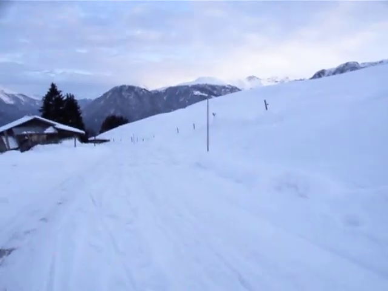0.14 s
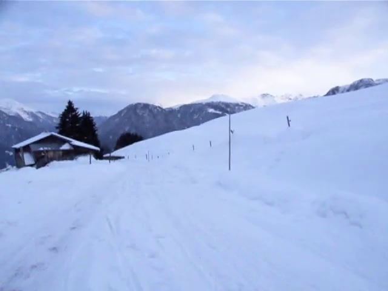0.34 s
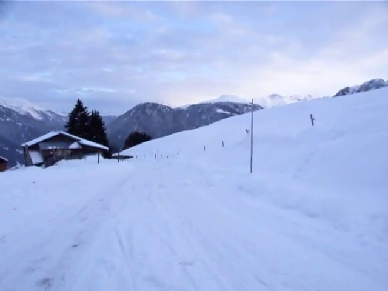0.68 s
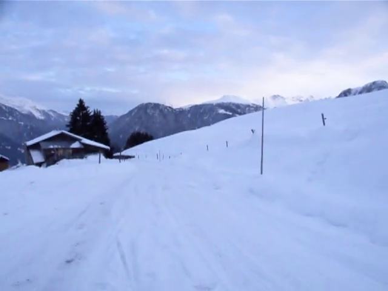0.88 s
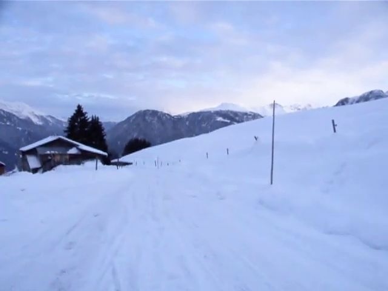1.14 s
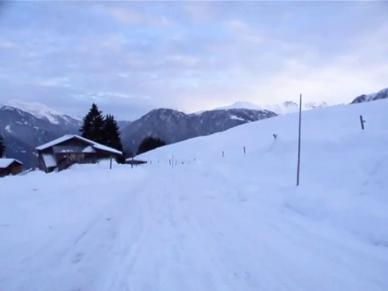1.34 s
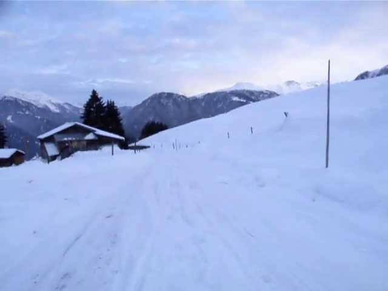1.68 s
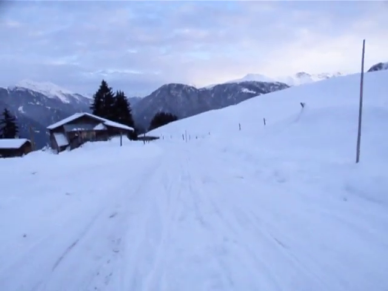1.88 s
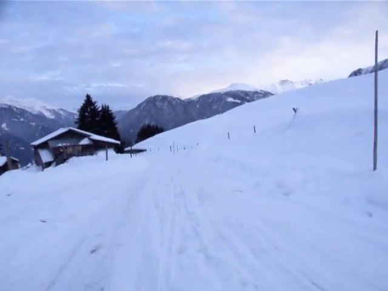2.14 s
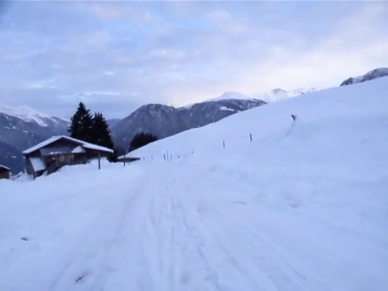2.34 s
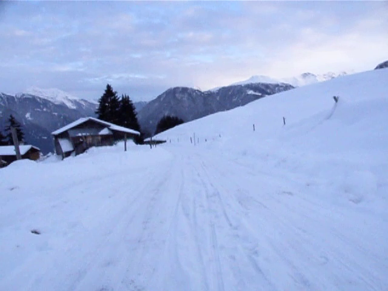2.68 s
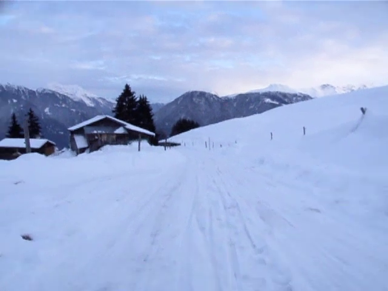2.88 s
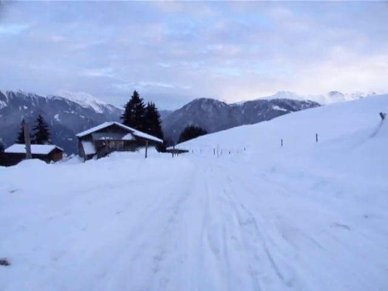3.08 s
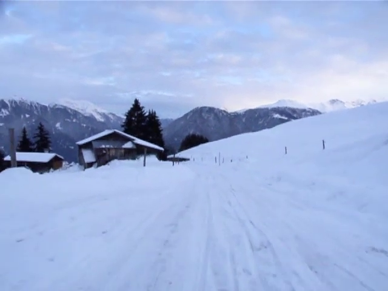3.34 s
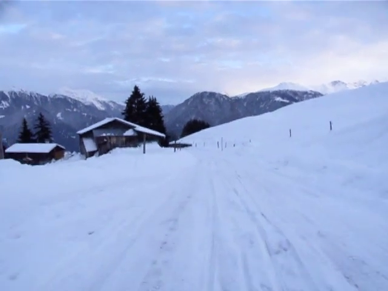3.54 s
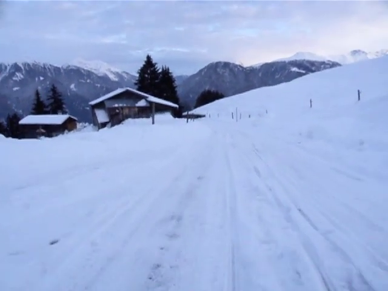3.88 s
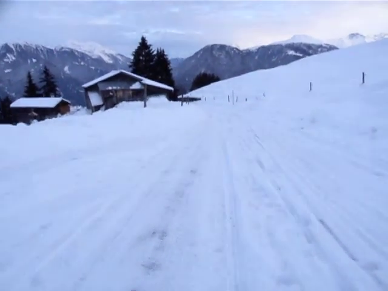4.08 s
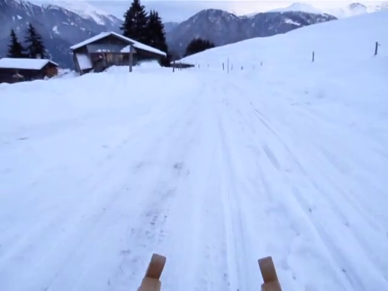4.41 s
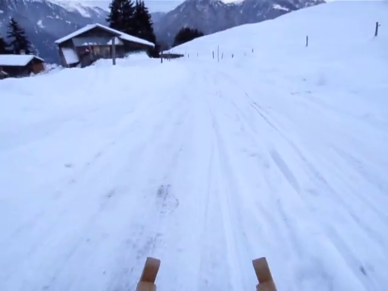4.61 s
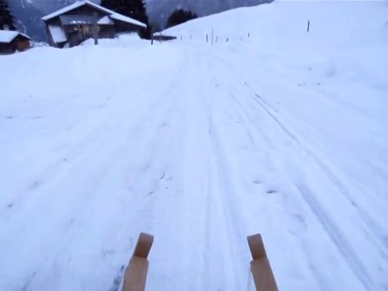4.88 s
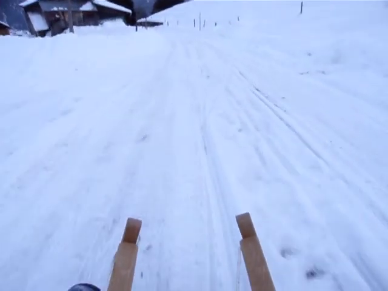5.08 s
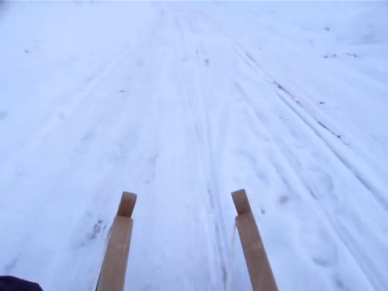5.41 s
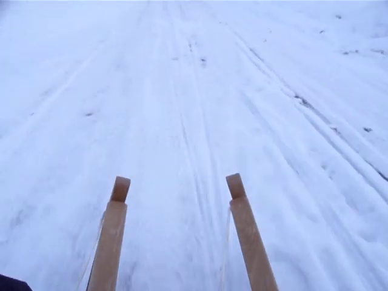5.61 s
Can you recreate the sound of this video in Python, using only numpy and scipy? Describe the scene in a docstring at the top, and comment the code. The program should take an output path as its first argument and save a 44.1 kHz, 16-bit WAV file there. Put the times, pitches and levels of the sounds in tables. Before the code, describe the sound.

Dull, narrow-band onboard sound of sledge runners rasping along a snowy track, knocking on ice lumps, with growing wind thumps on the microphone.

```python
"""Runners scrape and hiss over packed snow: a wooden sledge, heard through a small camera held by the rider.
Breaking snow crystals are random impulses and noise that set the resonances of the frame ringing.
Head wind buffets the microphone port: fluttering bands of low noise, with short waves for thumps.
Lumps of ice knock and rasp: rough bursts of force that ring the same frame, bent to the pitch of each blow.
The camera turns itself down after loud sounds, has a narrow band and flattens the highest peaks."""
import sys
import numpy as np
from scipy import signal
from scipy.io import wavfile

SR = 44100
rng = np.random.default_rng(int(sys.argv[2]) if len(sys.argv) > 2 else 0)


def nominal_scale(level):
    """Amplitude ratio for a level in decibels (scalar or array-like)."""
    x = np.asarray(level, float) / 20
    return 10 ** x


def waveform_to_disk(signal):
    """Save audio, clipped to [-1, 1], as 16-bit WAV at the path in sys.argv[1]."""
    frames = np.transpose(np.atleast_2d(signal))
    scaled = np.clip(frames, -1, 1) * 32767
    samples = np.round(scaled).astype(np.int16)
    wavfile.write(sys.argv[1], SR, samples)


N = 253134  # samples, about 5.74 s

# Runners pressed down and lifted by bumps in the road: start_s, level_db
SCRAPE_LEVELS = [(0, -25.5), (.12, -30.5), (.15, -20), (.24, -28), (.52, -26.5), (.66, -23), (.8, -29),
                 (.95, -31), (1.2, -31), (1.4, -28.5), (1.5, -33), (1.6, -26.5), (1.72, -31), (1.81, -24.5),
                 (1.98, -25), (2.08, -23), (2.18, -29), (2.44, -29.5), (2.5, -26), (2.61, -22),
                 (2.68, -31.5), (2.91, -26.5), (3.08, -29.5), (3.3, -29), (3.46, -29), (3.54, -34),
                 (3.8, -29), (3.97, -30.5), (4.08, -23), (4.22, -27), (4.38, -30), (4.5, -29),
                 (4.555, -29.5), (4.59, -29.5), (4.7, -31), (4.8, -30.5), (4.94, -22), (5.0, -27),
                 (5.07, -32.5), (5.13, -26), (5.21, -30), (5.27, -30), (5.36, -31), (5.4, -26), (5.55, -30),
                 (5.66, -25.5), (5.74, -30)]
# Colour of the scrape, relative to its level: start_s, hiss_db, rumble_db
SCRAPE_COLOUR = [(0, -2.5, 0), (.4, -3, 0), (.65, -1.5, -7), (.9, 3, -0.5), (1.18, -0.5, -4),
                 (1.4, -1.5, -3.5), (1.8, -2.5, -11), (2.1, -2.5, -3.5), (2.35, -0.5, -6), (2.7, -2, -4.5),
                 (3.1, -2.5, 0), (3.5, -2.5, -8.5), (4.2, -2.5, -3.5), (4.7, 1, -5), (5.1, -1.5, -0.5),
                 (5.74, 1, -3.5)]
# Resonances of the wooden frame, in three groups: pitch_hz, width_hz, level_db
LOW_MODES = [(343.7, 221, 0), (447.5, 236, 4), (593, 278, 0)]
MIDDLE_MODES = [(817, 266, -6.5), (1022.7, 118, 5), (1186, 200, 0)]
HIGH_MODES = [(1482, 135, -1.5), (1865, 308, 2.5), (2148, 370, 2), (2782, 380, 2), (3117, 346, 1.5),
              (3955, 320, 0.5)]
# Strength of the head wind: start_s, flutter_db, deep_buffeting_db
GUSTS = [(0, -38.5, -70), (.5, -48.5, -69), (1.25, -57, -68.5), (1.4, -39.5, -58), (1.53, -53, -58),
         (1.61, -38, -45), (1.8, -40.5, -52), (2.09, -35, -43.5), (2.28, -41.5, -49), (2.45, -52.5, -57.5),
         (2.75, -48, -71), (2.95, -40, -60.5), (3.12, -41, -62), (3.3, -42, -45.5), (3.55, -37.5, -41.5),
         (3.68, -31.5, -34.5), (3.82, -28, -39), (4.0, -26.5, -42), (4.2, -22, -48), (4.24, -35, -53.5),
         (4.3, -24, -47.5), (4.4, -32, -40.5), (4.5, -24, -37.5), (4.62, -27.5, -36), (4.68, -26, -29),
         (4.75, -28.5, -41), (4.82, -36, -50), (4.87, -33, -46), (4.92, -37, -35), (5.03, -19.5, -37),
         (5.085, -37, -33.5), (5.13, -19.5, -39), (5.19, -32, -30.5), (5.23, -32, -37), (5.4, -44.5, -48.5),
         (5.58, -33.5, -59), (5.74, -42, -51)]
# Colour of the wind noise, before each part is scaled to its gust level: pitch_hz, level_db (per Hz)
WIND_COLOUR = [(24, -50), (40, -23), (75, -22), (157, -7), (216, -2), (272, -4), (325, -3), (480, -15),
               (700, -27.5), (910, -36), (1540, -120)]
# Strong low thumps on the microphone, from eddies and jolts through the hand: start_s, peak_db, pitch_hz
THUMPS = [(1.435, -18, 377), (1.587, -21, 262), (1.621, -18.5, 242), (1.659, -20, 177), (1.825, -18.5, 330),
          (1.85, -13, 444), (2.048, -16, 475), (2.058, -21.5, 424), (2.589, -14, 420), (2.93, -7.5, 360),
          (3.0642, -5.5, 330), (3.106, -19, 380), (3.787, -9.5, 306), (3.816, -14, 318), (3.855, -15, 334),
          (3.951, -14, 263), (3.967, -13, 287), (3.992, -10.5, 298), (4.022, -13, 342), (4.048, -12, 376),
          (4.061, -8, 347), (4.122, -15, 314), (4.16, -17, 240), (4.2, -13, 285), (4.2264, -11.5, 397),
          (4.306, -4.5, 564), (4.452, -14.5, 237), (4.488, -11.5, 280), (4.503, -12, 334),
          (4.511, -17, 260), (4.549, -7.5, 246), (4.587, -11.5, 285), (4.613, -15, 273), (4.625, -11, 312),
          (4.632, -12.5, 330), (4.678, -11, 322), (4.722, -11.5, 250), (4.742, -16.5, 279),
          (4.857, -11.5, 228), (5.011, -10, 302), (5.023, -12, 250), (5.0558, -7, 340), (5.0675, -10, 340),
          (5.114, -14, 215), (5.155, -9.5, 295), (5.175, -9, 313), (5.332, -12, 335)]
# Lumps of ice under the runners, pitch being that of the mode struck hardest and reach
# how far the blow spreads to the others: start_s, peak_db, pitch_hz, reach_octaves, contact_ms
LUMPS = [(0.138, -8.5, 1540, 0.57, 4.4), (0.144, -12, 945, 1.4, 8), (0.156, -10.5, 937, 0.57, 3.2),
         (0.1902, -.8, 430, 1.1, 1.8), (0.189, -10, 2600, 1, .8), (0.211, -9, 2820, 0.84, 5.8),
         (0.259, -15, 820, 0.54, 4.5), (0.291, -15.5, 602, 0.68, 11), (0.398, -18.5, 2080, 0.18, 13),
         (0.566, -15, 1150, 1.1, 41), (1.277, -14.5, 1170, 3.3, 12.3), (1.38, -13, 1103, 3.2, 2.9),
         (1.418, -15.5, 2260, 1.2, 5), (1.786, -22, 1280, .6, 4.5), (1.789, -10, 1810, 1, 4.9),
         (1.792, -13, 2820, .6, 4.6), (1.826, -13.5, 1110, 0.8, 1.3), (1.849, -7.5, 1104, 2, 7.2),
         (1.938, -17.5, 625, 2, 4.5), (1.974, -12.5, 1130, 0.92, 4.6), (2.044, -10, 1620, 3.1, 29),
         (2.08, -13, 840, 2.4, 8.3), (2.3236, -5, 1042, 0.79, 5.2), (2.478, -18, 1050, 0.6, 12),
         (2.588, -7, 1530, 1, 6), (2.891, -14.5, 2110, 1.8, 2.7), (2.905, -14, 1120, 0.8, 3.6),
         (2.915, -8, 1094, 1.2, 1.7), (2.922, -8, 1102, 0.52, 7.3), (2.9285, -9, 1342, 1.4, 2.2),
         (2.98, -16, 1000, 0.39, 5.5), (3.028, -18.5, 600, 1.5, 2.1), (3.0638, -6.5, 546, 1.7, 3.5),
         (3.069, -5.5, 570, 1.8, 5.2), (3.104, -7.5, 554, 2.7, 2.7), (3.569, -16.5, 1010, 1.16, 3.8),
         (4.211, -11, 990, 0.43, 11), (4.2276, 2.5, 3450, .5, 1.5), (4.2287, 1.5, 2000, .6, 1.3),
         (4.279, -9, 1547, 3.1, 25), (4.323, -18.5, 2700, 0.67, 11), (4.462, -8, 1000, 1.16, 2.8),
         (4.477, -12, 2180, 0.53, 6.4), (4.506, -8.5, 1165, 4.7, 3), (4.588, -10.5, 919, 2.5, 7.2),
         (4.623, -9, 2500, 0.66, 1.8), (4.649, -18, 1500, 0.87, 8.8), (4.674, -13, 2270, 2.6, 8.3),
         (4.818, -14.5, 1430, 1.6, 4.1), (4.913, -3, 1099, 1.8, 1.1), (4.921, -7, 2160, 1.4, 4.5),
         (4.9903, -.7, 2750, 0.8, 0.3), (5.119, -12.5, 1097, 0.36, 10.4), (5.15, -18, 1101, 0.35, 9.8),
         (5.236, -13, 1000, 4.8, 9.9), (5.327, -9, 1093, 1.8, 16)]

RING_DB = -2.5  # ring of the middle modes, relative to the level of the scrape

# lesser eddies at random; their peak is relative to the flutter
EDDY_COUNT, EDDY_DB, EDDY_LOW_HZ, EDDY_HIGH_HZ = 260, 6.5, 146, 520

# small lumps at random: level give or take the spread, and the longest contact
SMALL_COUNT, SMALL_DB, SMALL_SPREAD_DB, SMALL_LONGEST_MS = 60, -20, 1, 9.8
SMALL_LOW_HZ, SMALL_HIGH_HZ, SMALL_REACH_OCTAVES = 440, 3410, 1.5

# a contact snaps above its grit after SNAP_S; long rasps snap less
SNAP_S, SNAP_DB, SNAP_LOSS_DB_PER_MS = 0.001746, 16.5, 0.47
RASP_BUILD = 0.29  # share of the contact time added to SNAP_S while the grit swells
SHORTEST_MS = 0.3  # shorter contacts fade and damp the frame as if they lasted this long
PRESS_MS = 0.3  # a contact this short presses so hard that it doubles the damping
FALL_DB, FARTHEST_DB = 8.5, -29  # loss at the edge of a blow's reach; the most any mode loses


def rms_one(x):
    """Scale to unit power."""
    return x / np.sqrt(np.mean(x ** 2) + 1e-20)


def in_time(rows):
    """Join the points of a table by straight lines: one value a sample for each column."""
    s, *columns = np.transpose(rows)
    return [np.interp(np.arange(N) / SR, s, c) for c in columns]


def drift(rate_hz):
    """Slow random wandering around zero, with a typical size of 1."""
    r = np.exp(-2 * np.pi * rate_hz / SR)
    # the first second is thrown away so that the filter has settled
    slow = signal.lfilter([1], [1, -2 * r, r * r], rng.standard_normal(N + SR))[SR:]
    return rms_one(slow - slow.mean())


def resonate(x, hz, width):
    """One resonance: it rings near hz, dies away faster when wider, and has gain 1 on top."""
    r = np.exp(-np.pi * width / SR)
    top = np.array([1, 0, -1]) * (1 - r * r) / 2
    bottom = [1, -2 * r * np.cos(2 * np.pi * hz / SR), r * r]
    return signal.lfilter(top, bottom, x)


def crackle(per_s, spread_db, smooth):
    """Random impulses of uneven size, bedded in a share of smooth noise; rms about 1."""
    sizes = nominal_scale(spread_db * np.minimum(rng.exponential(1, N), 5)) * rng.choice([-1, 1], N)
    breaks = rms_one(sizes * (rng.random(N) < per_s / SR))
    return np.sqrt(1 - smooth) * breaks + np.sqrt(smooth) * rng.standard_normal(N)


def scrape(modes, force, patchy_db):
    """The sliding force rings each mode, whose coupling to the snow keeps shifting."""
    total = 0
    for k, (hz, width, db) in enumerate(modes):
        coupling = (-1) ** k * nominal_scale(db + patchy_db * drift(14.3))
        total = total + coupling * resonate(force, hz, width)
    return rms_one(total)


def runners(rumble_db, ring_db, hiss_db):
    """The force of breaking crystals drives the whole frame; ripples in the track make it throb unevenly."""
    force = crackle(per_s=2500.0, spread_db=1.43, smooth=0.61)
    force = force * nominal_scale(1.44 * drift(18.0))
    rumble = nominal_scale(rumble_db) * scrape(LOW_MODES, force, patchy_db=2.0)
    ring = nominal_scale(ring_db) * scrape(MIDDLE_MODES, force, patchy_db=0.0)
    hiss = nominal_scale(hiss_db) * scrape(HIGH_MODES, force, patchy_db=1.23)
    # the slim frame radiates little bass
    bass_cut = signal.butter(3, 200.0, "high", fs=SR, output="sos")
    return signal.sosfilt(bass_cut, rumble + ring + hiss)


def wind(deep_db, flutter_db):
    """Lumpy low noise in half-octave bands that flutter partly together; slow eddies fill the deep bands."""
    deep, flutter = 0, 0
    together = drift(24.0)
    edges = 40 * 2 ** np.arange(0, 4.6, .5)
    at, db = np.transpose(WIND_COLOUR)
    # single eddies burst over the port; neighbouring bands take turns between two noises
    noises = [crackle(per_s=120.0, spread_db=1.0, smooth=0.82) for _ in range(2)]
    for k, (low, high) in enumerate(zip(edges, edges[1:])):
        band_filter = signal.butter(2, [low, high], "band", fs=SR, output="sos")
        band = signal.sosfilt(band_filter, noises[k % 2])
        level_db = np.interp(np.log(low * high) / 2, np.log(at), db)
        if high < 120:
            deep = deep + nominal_scale(level_db + 2.5 * drift(6.0)) * band
        else:
            flutter = flutter + nominal_scale(level_db + 1.5 * together + 1.0 * drift(3.7)) * band
    return nominal_scale(deep_db) * rms_one(deep) + nominal_scale(flutter_db) * rms_one(flutter)


def lesser_eddies(flutter_db):
    """Small eddies at random times, stronger when the wind flutters more."""
    when, pitch = rng.random((EDDY_COUNT, 2)).T
    place = when * (N - 1)
    peak_db = flutter_db[place.astype(int)] + EDDY_DB
    hz = EDDY_LOW_HZ * (EDDY_HIGH_HZ / EDDY_LOW_HZ) ** pitch
    return np.transpose([place / SR, peak_db, hz])


def thumps(flutter_db):
    """An eddy or a jolt pushes the microphone membrane through about a cycle and a half."""
    out = np.zeros(N + SR)
    for s, peak_db, hz in np.vstack([lesser_eddies(flutter_db), THUMPS]):
        turns = np.arange(round(3 * SR / hz)) * hz / SR
        push = np.sin(2 * np.pi * turns) * np.exp(-((turns - .8) / 0.58) ** 2)
        at = round(s * SR)
        out[at:at + len(push)] -= nominal_scale(peak_db) * push
    return signal.sosfilt(signal.butter(2, 110.0, "high", fs=SR, output="sos"), out[:N])


def small_lumps():
    """Small lumps met at random times, in the same columns as LUMPS."""
    when, size, where, lasting = rng.random((SMALL_COUNT, 4)).T
    peak_db = SMALL_DB + SMALL_SPREAD_DB * (2 * size - 1)
    pitch_hz = SMALL_LOW_HZ * (SMALL_HIGH_HZ / SMALL_LOW_HZ) ** where
    reach = np.full(SMALL_COUNT, SMALL_REACH_OCTAVES)
    return np.transpose([when * (N - 1) / SR, peak_db, pitch_hz, reach, SMALL_LONGEST_MS * lasting])


def contact_force(grit, t, ms):
    """A rough contact: gritty noise swells and fades, with one sharp snap near its start."""
    swell = np.minimum(t / (SNAP_S + RASP_BUILD * ms / 1000), 1) ** 2
    fade = np.exp(-(t * 1000 / max(ms, SHORTEST_MS)) ** 2)
    force = grit * swell * fade
    force[round(SNAP_S * SR)] += nominal_scale(SNAP_DB - SNAP_LOSS_DB_PER_MS * ms)
    return force


def lumps():
    """Short contacts knock and long ones rasp; the load bends the modes to the pitch of the blow."""
    out = np.zeros(N)
    t = np.arange(round(.12 * SR)) / SR
    blows = np.vstack([small_lumps(), LUMPS])
    modes = np.vstack([LOW_MODES, MIDDLE_MODES, HIGH_MODES])
    rough = rng.standard_normal((len(blows), len(t)))
    for (s, peak_db, pitch_hz, reach, ms), grit in zip(blows, rough):
        force = contact_force(grit, t, ms)
        nearest = np.argmin(np.abs(np.log(modes[:, 0] / pitch_hz)))
        bend = pitch_hz / modes[nearest, 0]
        hit = 0
        for hz, width, db in modes:
            damped = width * (1 + PRESS_MS / max(ms, SHORTEST_MS))
            # twice through, so that a blow speaks in the modes and little between them
            ring = resonate(resonate(force, bend * hz, 2 * damped), bend * hz, damped)
            away = np.log2(bend * hz / pitch_hz) / max(reach, .1)
            mode_db = db + max(-FALL_DB * away ** 2, FARTHEST_DB)
            hit = hit + nominal_scale(mode_db) * ring / np.abs(ring).max()
        at = round(s * SR)
        out[at:at + len(t)] += nominal_scale(peak_db) * hit[:N - at] / np.abs(hit).max()
    return out


def scene():
    """Sledge and wind added together; open snow gives no echo."""
    scrape_db, = in_time(SCRAPE_LEVELS)
    hiss_db, rumble_db = in_time(SCRAPE_COLOUR)
    flutter_db, deep_db = in_time(GUSTS)
    sliding = runners(scrape_db + rumble_db, scrape_db + RING_DB, scrape_db + hiss_db)
    air = wind(deep_db, flutter_db) + thumps(flutter_db)
    return (sliding + air + lumps())[None]


def duck(x, knee_db, cut_per_db, excess_fall_db_s):
    """Gain control: peaks over the knee pull the gain down, and it climbs back at a steady rate."""
    ramp = excess_fall_db_s * np.arange(N) / SR
    excess = np.maximum(20 * np.log10(np.abs(x) + 1e-9) - knee_db, 0)
    # the highest excess so far is held, but sinks along the ramp
    held = np.maximum.accumulate(excess + ramp, axis=-1) - ramp
    r = np.exp(-1 / (0.0045 * SR))  # gain moves are smoothed over 4.5 ms
    return x * nominal_scale(-cut_per_db * signal.lfilter([1 - r], [1, -r], held))


def low_sample_rate(x):
    """Stored at 8 kHz and stretched back: a soft filter lets a mirror of the top band leak above 4 kHz."""
    stored = signal.resample_poly(x, 80, 441, axis=-1)
    soft = signal.firwin(30 * 441 + 1, 1 / 441, window=("kaiser", 9.0))
    back = signal.resample_poly(stored, 441, 80, axis=-1, window=soft)
    return back[:, :N]


def roll_off(x):
    """The treble ends steeply here."""
    return signal.sosfilt(signal.butter(12, 16500, fs=SR, output="sos"), x)


def record(dry):
    """The camera: gain control, bass cut, band limit, low sample rate and hard overload of high peaks."""
    x = duck(dry, knee_db=-15.5, cut_per_db=0.3, excess_fall_db_s=134.0)
    x = signal.sosfilt(signal.butter(3, 80.0, "high", fs=SR, output="sos"), x)
    x = signal.sosfilt(signal.cheby2(14, 30, 4188, fs=SR, output="sos"), x)
    x = x + nominal_scale(-74) * drift(55)  # the camera's own low noise
    x = np.clip(low_sample_rate(x), -.73, .73)
    x = x - .0027  # a small constant offset
    return roll_off(x)


dry = scene()
out = record(dry)
waveform_to_disk(out)
```